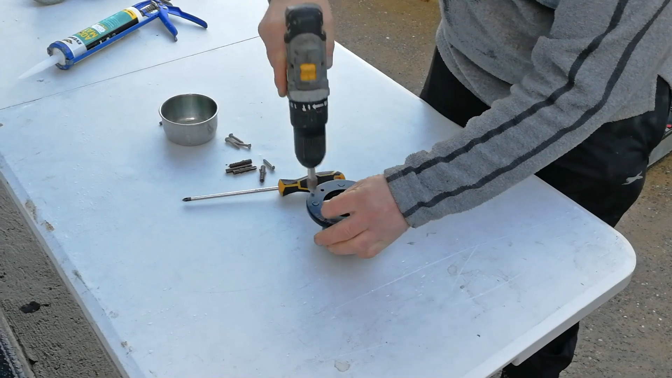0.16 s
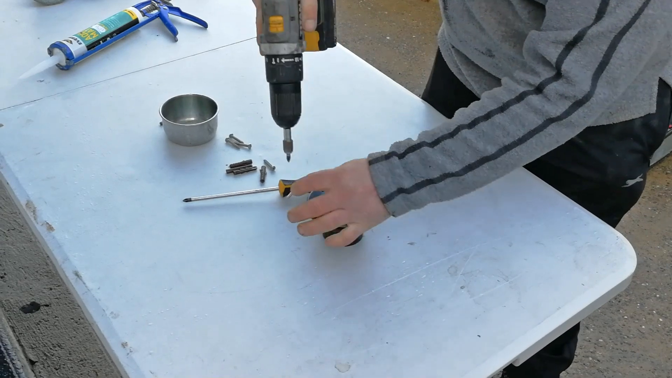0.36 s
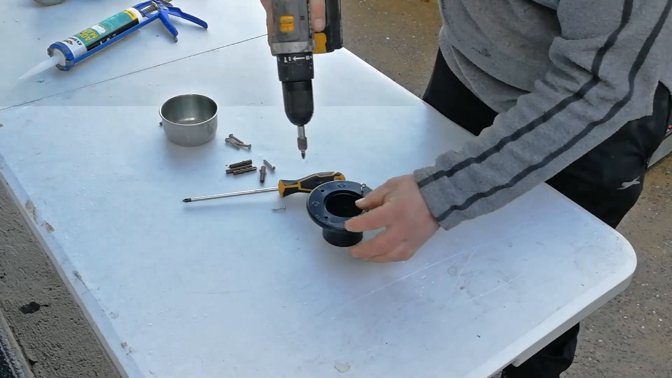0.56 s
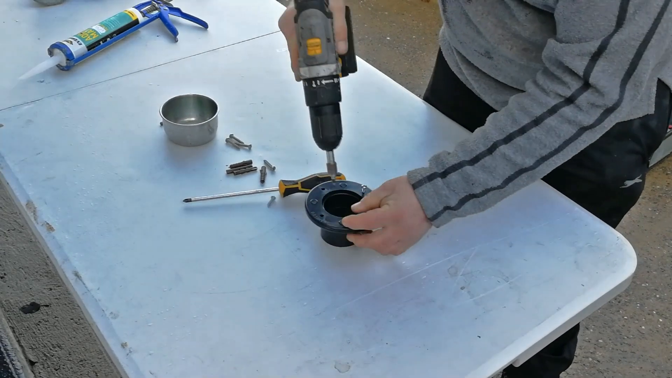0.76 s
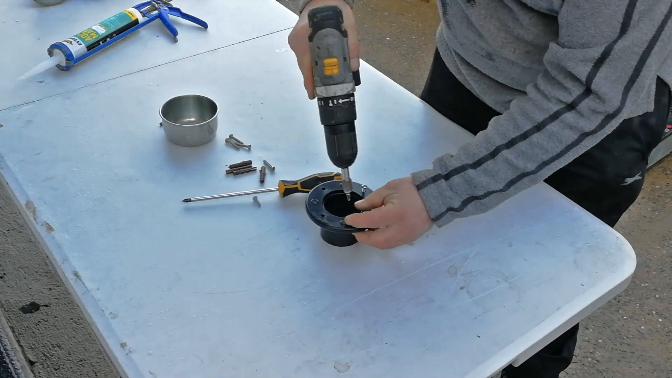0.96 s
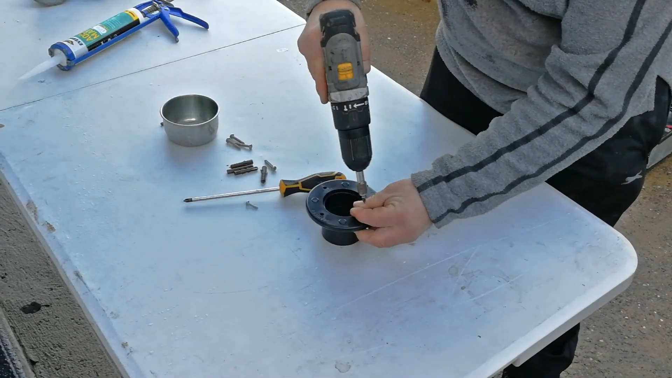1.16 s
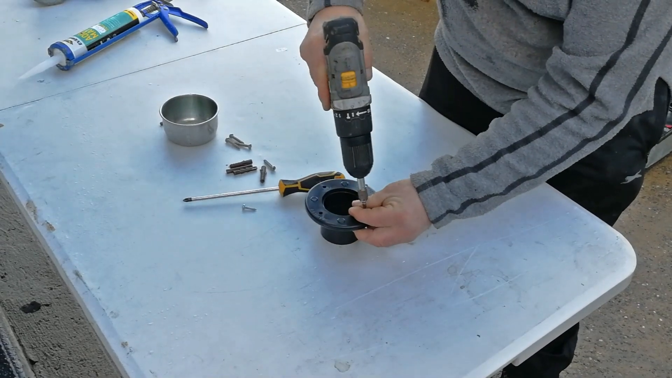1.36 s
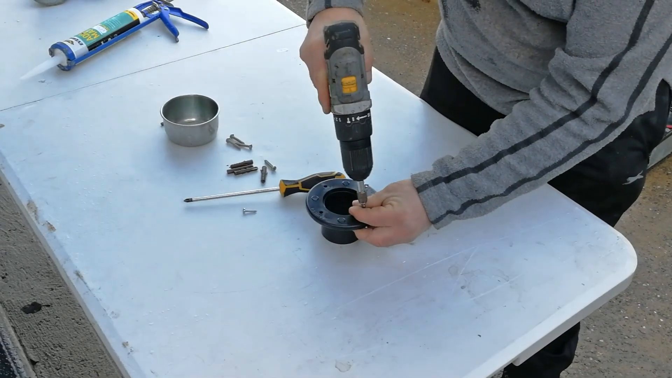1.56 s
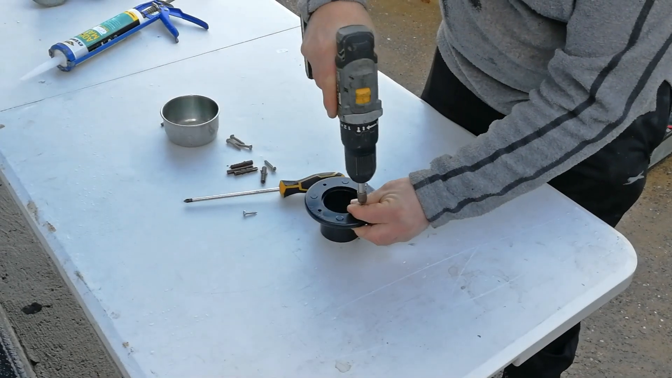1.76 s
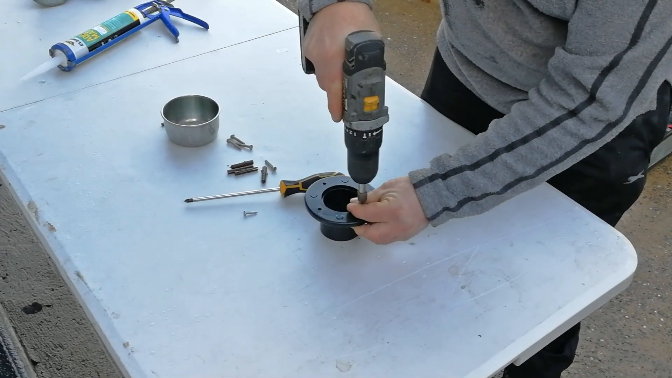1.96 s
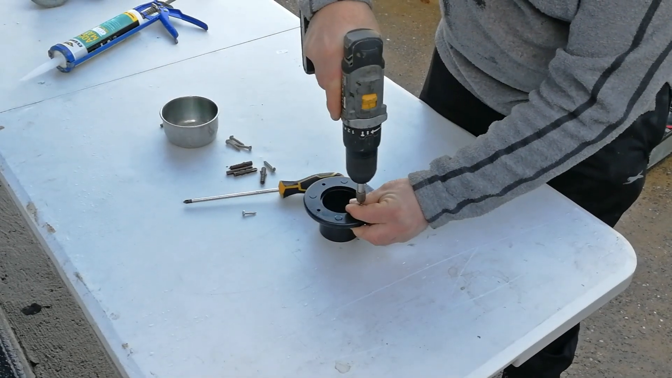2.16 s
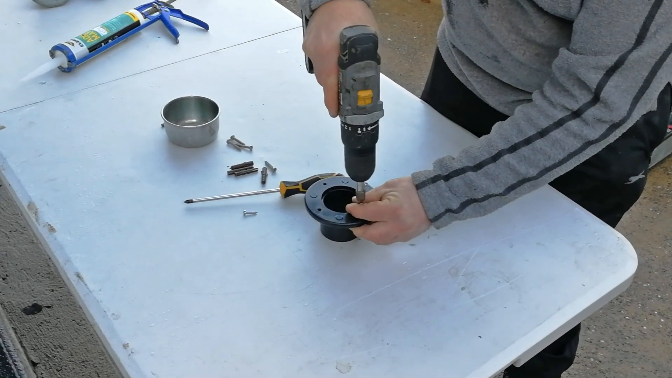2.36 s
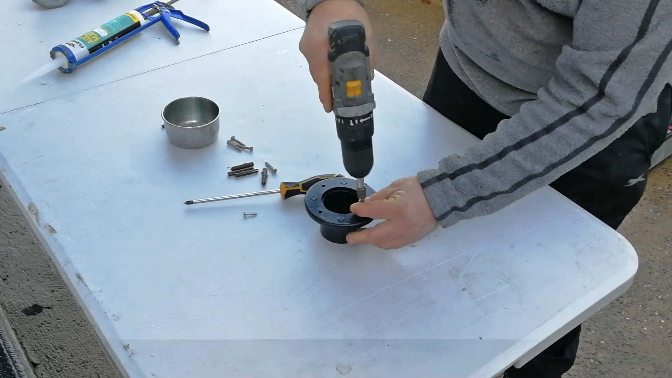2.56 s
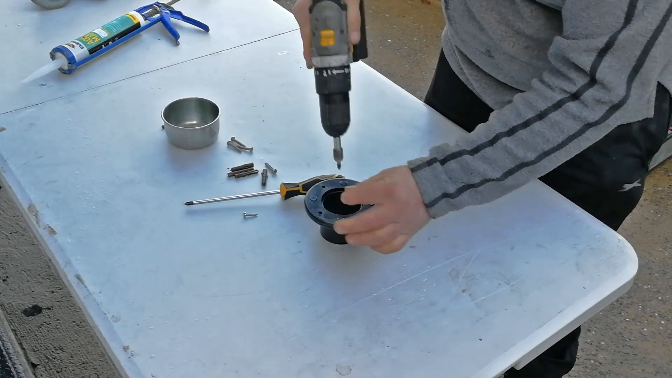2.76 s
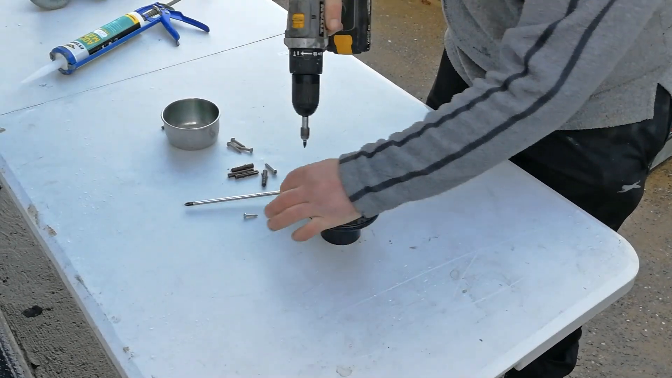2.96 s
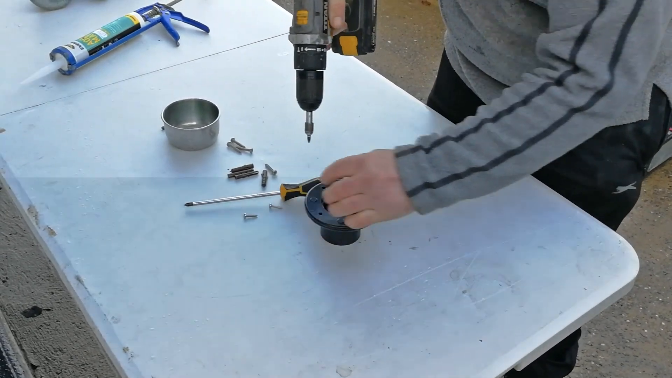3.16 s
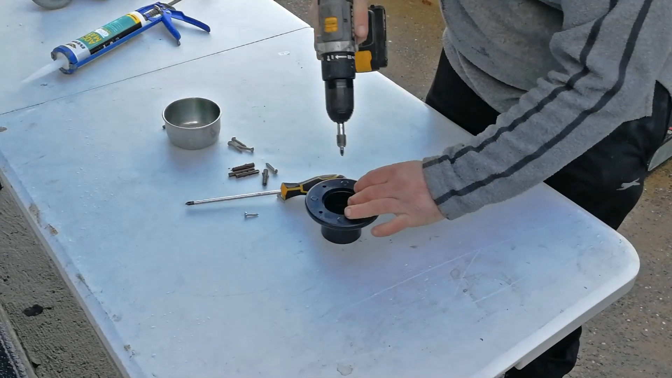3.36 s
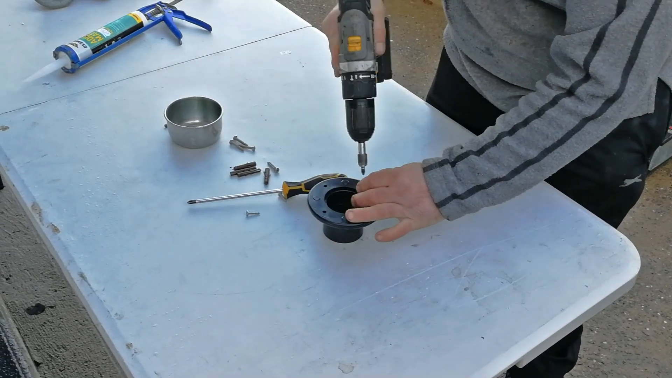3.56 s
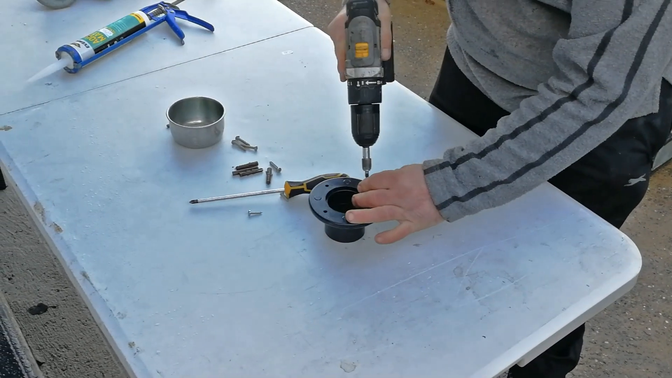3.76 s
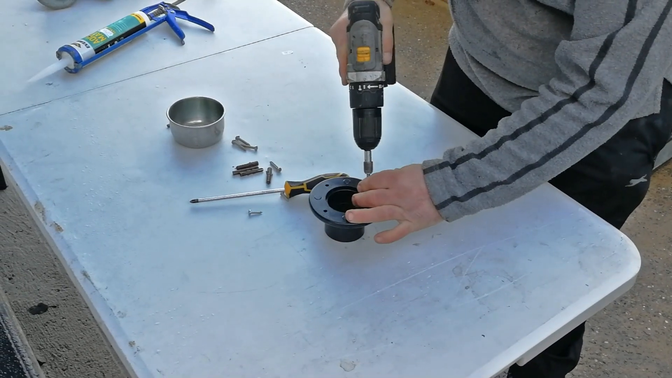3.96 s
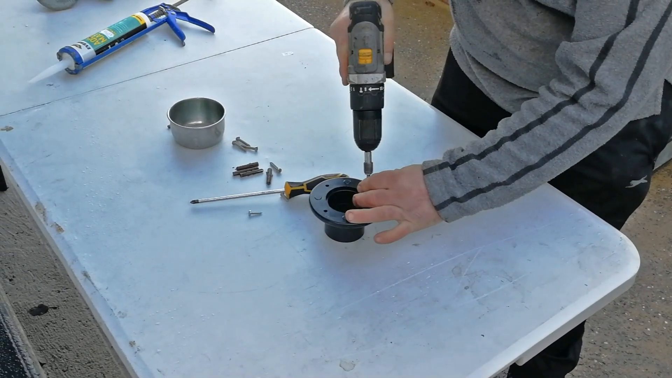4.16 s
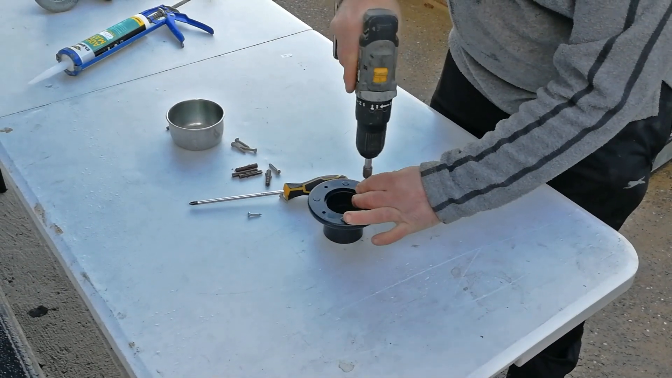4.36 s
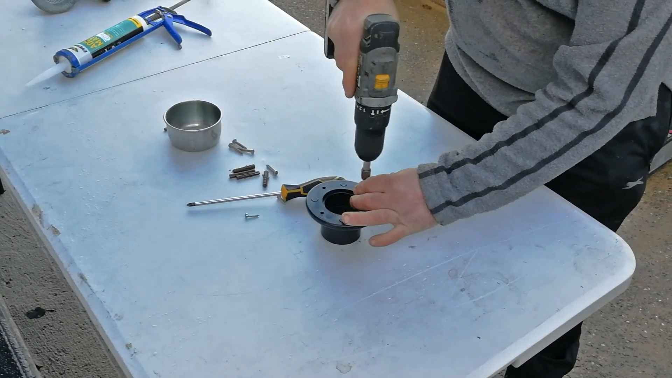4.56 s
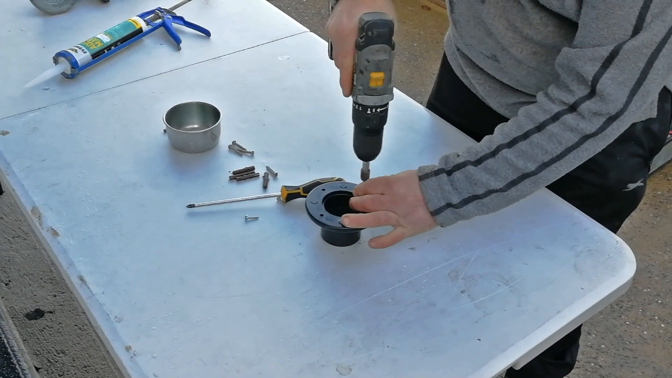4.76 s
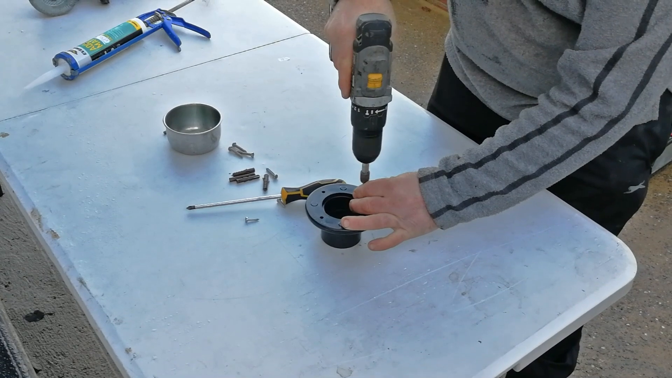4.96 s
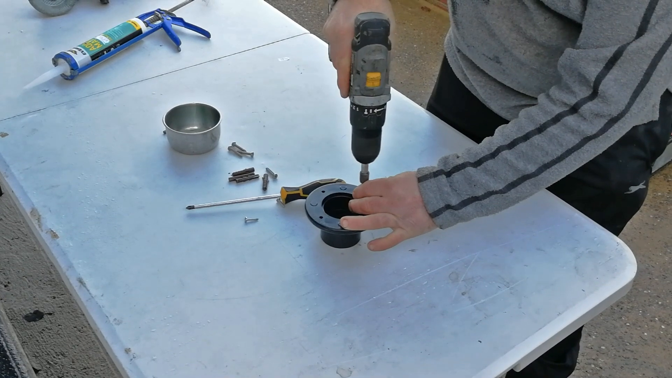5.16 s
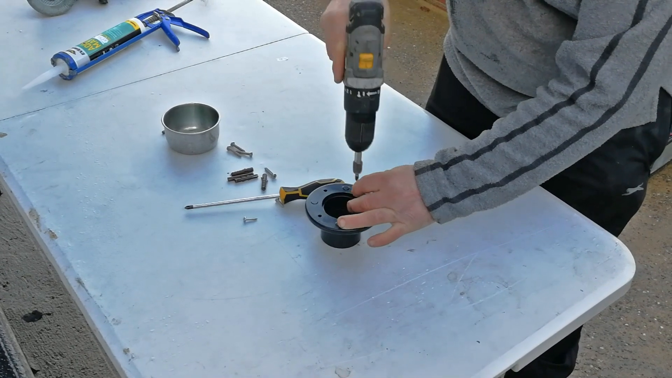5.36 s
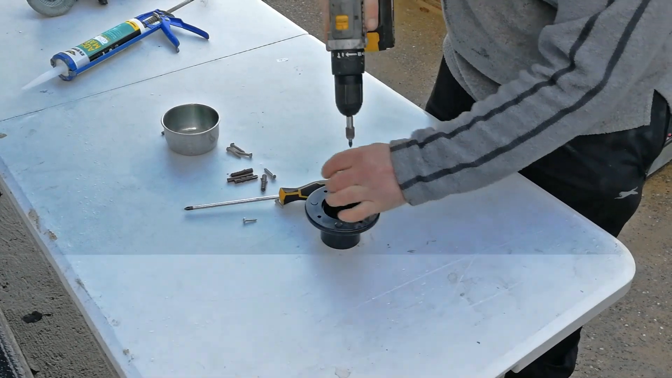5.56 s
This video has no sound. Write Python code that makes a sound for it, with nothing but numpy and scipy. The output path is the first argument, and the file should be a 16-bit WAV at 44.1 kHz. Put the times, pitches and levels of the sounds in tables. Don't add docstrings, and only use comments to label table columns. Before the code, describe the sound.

A close stereo pickup hears the tail of a drill run, a click, then a small metal screw skittering on hollow plastic. Bit ticks and faint rubbing lead into a gritty, whining drill burst that stops sharply. More screw bounces, a firm scrape and low tabletop knocks come before the final burst, with uneven jolts under it. Soft traffic rumble and slight hiss fill the open yard.

```python
import sys
import numpy as np
from scipy import signal
from scipy.fft import rfft, irfft, next_fast_len
from scipy.io import wavfile
from scipy.ndimage import uniform_filter1d

SR = 44100
rng = np.random.default_rng(int(sys.argv[2]) if len(sys.argv) > 2 else 0)


def level_to_linear(level):
    exponent = np.asarray(level, float) / 20
    return 10 ** exponent


def generate_wav(signal):
    frames = np.transpose(np.atleast_2d(signal))
    scaled = np.clip(frames, -1, 1) * 32767
    pcm = np.round(scaled).astype(np.int16)
    wavfile.write(sys.argv[1], SR, pcm)


N = 246959
SIZE = next_fast_len(N + 8192)
HZ = np.maximum(np.arange(SIZE // 2 + 1) * SR / SIZE, 1.)
TIME = np.arange(N) / SR
TOP_HZ = 15750
RIGHT_LAG_S = 0.00012

# (time [s], one per run)
PULL_TIMES = (-1, 1.7642, 4.4328)
LATCH_TIMES = (.1039, 2.5925, 5.3064)
# (commutator whine over rattle [dB], latch click over its usual [dB])
RUNS = [
    (-21, 0.0),
    (-7, 1),
    (-12.5, -6),
]
# (time [s], rattle level [dB], mesh whine over rattle [dB])
GEAR_LOAD = [
    [(0.0, -38.5, -2), (.11, -40.5, -1.5)],
    [(1.76, -39, -7), (1.89, -37.5, -3), (2.0, -36.5, -3.5), (2.18, -35.5, 1), (2.35, -38, -2.5),
     (2.6, -41, -9.5)],
    [(4.43, -39, -9), (4.55, -37.5, -7), (4.62, -36, -3), (4.8, -35.5, -13), (4.9, -35.5, -6),
     (5.1, -38.5, -10), (5.32, -39.5, -11)],
]
WHINE_MULTIPLES = (1, 2, 10, 20, 21, 25, 28, 31, 32, 34, 35, 36, 37, 41)
# (left level [dB], right level [dB], change after the regrip [dB])
UPPER_WHINE = [(-24.5, -28, 1.5), (-25.5, -41, 4), (-14.5, -30, -3), (-24, -27, 3), (-13, -17, -8),
               (-14.5, -35, 5), (-21, -32, -10), (-24, -32, -3), (-26, -37, 4), (-27, -40, -3.5),
               (-8, -40, -3), (-11, -41, -5), (-30, -38.5, -4), (-17, -30, -5)]
WHINE_PAN_DB = {5: -24, 15: 12.5}
# (frequency [Hz], left level [dB], right level [dB])
HOUSING = [(320, -19.5, -17), (509.26, -23.5, -36), (794, -20, -37), (972, -5.5, -9.5), (1363, 2, 2.5),
           (1570, -4.5, -1), (1847, 0, 4.5), (2213, -18, 0), (2470, 0, -38), (3440, -25.5, -38)]
# (frequency [Hz], left level [dB], right level [dB])
VENTS = [(1765.7, -24, -20), (2620, -3.5, -4.5), (3100, -3, -7.5), (3440, 2, -0.5), (3793.7, -7.5, -23.5),
         (4368.7, -3.5, -6), (4376, -7.5, -11.5), (5780, -1.5, -15.5), (7058, -7, -13.5),
         (7897, -16, -10.5), (8888, -9, -21), (10700, -13, -31), (14950, -16, -52), (15953, -26, -25)]
# (time after pull or latch [s], ring level [dB], skin over ring [dB], steel over ring [dB], mode [Hz])
TRIGGER_CLICKS = [
    (-.04, -51.5, 7, -1, 6500),
    (0.0, -43, 6.5, -16, 3500),
]
BRAKE_CLICKS = [
    (-.0257, -36.5, -4, -16, 1800),
    (0.0169, -41.5, 0.5, 1.5, 5000),
]
LATCH_CLICK = (0.0, -39, 11, -18, 1680)
# (time [s], ring level [dB], skin over ring [dB], loudest mode [Hz])
SCREW_BOUNCES = [(0.4, -22.5, -6, 3120), (0.4093, -18, -8, 3260), (0.4146, -22.5, -12, 3680),
                 (0.4861, -27, -4, 4420), (0.495, -24, -16, 3110), (0.5073, -34, -11.5, 2930),
                 (0.5292, -32.5, -20, 4800), (3.0109, -19.5, -4.5, 4720), (3.018, -17, -3, 3300),
                 (3.0415, -33, -2, 2682), (3.0746, -47, 6, 2000), (3.0983, -25, 2.5, 2720),
                 (3.1241, -39, 4, 2820), (3.1287, -35.5, -9, 2700), (3.1386, -45, -3, 1215)]
# (time [s], ring
# level [dB], skin over ring [dB], loudest mode [Hz])
FITTING_KNOCKS = [(0.3715, -66, 14, 3080), (0.6666, -42, -14, 4860), (0.674, -48, -10, 4900),
                  (0.8263, -46, -2, 4550), (1.8273, -41.5, 16, 1070), (2.0995, -29.5, -3, 1753),
                  (3.3067, -48, -24.5, 2562), (3.3309, -44.5, -19, 2636), (3.4191, -60, 0, 3022),
                  (3.903, -38.5, -1, 3250), (4.4465, -42, 3, 1280), (4.468, -43, 13, 680),
                  (5.3217, -52, 19, 1760)]
# (time [s], ring level [dB], skin over ring [dB], loudest mode [Hz])
BIT_TICKS = [
    (1.3586, -41.5, 2.5, 7037),
    (1.393, -54.5, -5.5, 6626),
    (1.4029, -56, -0.5, 7671),
    (1.4165, -59, 1.5, 7497),
    (3.8929, -46.5, 6.5, 7500),
    (3.9594, -46.5, 1, 8090),
    (4.2864, -40, 1, 7800),
]
# (start [s], hardest [s], end [s], level [dB], brighter by [dB])
SCRAPES = [
    (.415, .425, .484, -43, -1),
    (3.02, 3.035, 3.097, -42, -3),
    (0.495, 0.498, 0.6, -41, -6.5),
    (0.595, 0.653, 0.78, -54, -1),
    (.93, .99, 1.2, -62.5, -2),
    (1.63, 1.71, 1.8, -58.5, 8.5),
    (3.125, 3.127, 3.23, -48, -11),
    (3.29, 3.33, 3.38, -49, -7),
    (3.96, 3.975, 4.6, -70, -7),
    (4.286, 4.31, 4.36, -34.5, -8.5),
]
# (frequency [Hz], width [Hz], left level [dB], right level [dB])
SKIN_MODES = [(702, 125, -10.5, -21), (1096, 130, 3.5, -4), (1497, 990, 1, -14), (1716, 526.5, 2, 4.5)]
SCREW_MODES = [(2770, 150, -2, -15), (3110, 610, 2, -7.5), (3710, 610, 1, -1), (4239.6, 385.1, 0, -11),
               (5156.2, 510, -2, -11.5)]
TICK_MODES = [(6300, 890, 8, -2), (7720, 710, 7, -2), (8930, 590, 8, -2.5), (10879, 960, -6.5, -22.5),
              (13212, 1900, -3.5, -15.5), (14401, 400, -23, -38.5)]
STEEL_MODES = [(7588, 1101, -5.5, -5), (9751, 1695, 2, -7.5), (12700, 1632, 3.5, -9),
               (14735, 1500, -3, -10)]
# (time [s], level [dB])
PUSHES = [(0.022, -29.5), (1.368, -33.5), (1.381, -43), (1.828, -26.5), (1.869, -30.5), (1.899, -49),
          (3.89, -29), (4.254, -38.5), (4.287, -27), (4.469, -21), (4.499, -32.5)]
# (time [s], level [dB])
JOLTS = [(1.985, -30.5), (2.254, -38), (2.334, -37.5), (2.391, -36.5), (2.449, -42), (4.2931, -22),
         (4.3073, -27.5), (4.329, -33), (4.767, -28.5), (4.802, -28), (4.819, -30.5), (4.839, -34),
         (4.864, -30), (4.925, -26.5), (4.959, -30), (5.054, -31.5), (5.079, -26.5), (5.103, -33),
         (5.124, -39.5)]
# (frequency [Hz], level [dB], t60 [s])
TOP_MODES = [(109.7, -17.5, 0.68), (138.5, 0, 0.24672), (155.2, -1, 0.19), (188.4, -8, 0.2),
             (260.82, -12, 0.13), (339, -13.5, 0.15), (423, -10, 0.13), (560, -23, 0.093), (650, 1, 0.086)]
# (frequency [Hz], level [dB per Hz])
TRAFFIC_SPECTRUM = [(12, -33), (20, -2.5), (60, 0.5), (101, -2.5), (127, -7), (222, -5), (270, -8),
                    (377, -16), (422, -11.5), (499, -19), (1090, -7), (1710, -16), (2020, -15.5),
                    (2390, -24), (16000, -53.5)]
# (frequency [Hz], left minus right [dB])
TRAFFIC_PAN = [(60, 0), (350, -1.5), (700, 1.5), (1500, -.5), (2200, -1.5), (3500, 5.5), (5500, 3),
               (8000, .5)]
# (time [s], swell [dB])
TRAFFIC_SWELL = [
    (0, 2),
    (.7, 3),
    (1.2, 1.5),
    (1.7, 1.5),
    (2.8, -1.5),
    (3.6, -1),
    (4.2, 0),
    (5.6, 0.5),
]
# (frequency [Hz], near sources [-1 to 1], far sources [-1 to 1])
ALIKE = [(150, 0.94, 1), (294, 0.63, 0.73), (616, -.2, -.4), (1095, 1, 0), (1620, 0.66, 0.1),
         (2834.4, 0.59, 0), (4140.5, 0.63, 0), (5937, 0.51, 0.1), (9116, 0.2, 0), (15000, 0.7, 0)]

FREE_HZ, FULL_HZ, START_SHARE, SPIN_UP_S = 352, 347.4, .505, .074
SOFT_START_S, SOFT_START_DB = .075, -20.5
BRAKE_S, BRAKE_DROP_HZ, BRAKE_SURGE_DB, CUT_S, CUT_DB = .066, 40, 5.5, 0.023, -25
LOADED_DB, WHINE_PER_LOAD, HISS_PER_LOAD = -36, 1.5, 0.35
HISS_FULL_DB, HISS_SLOW_DB, HISS_BRAKED_DB = -1, 22.5, -3.5
HISS_WAKE_DB, HISS_WAKE_S, MESH_BRAKED_DB = -16, .016, 7
REGRIP_S = 3.5
# (steel tick over ring [dB], t60 [s], more t60 per dB of skin [s]); flat landings ring longer
SCREW_HIT, FITTING_HIT, BIT_HIT = (-7.5, .038, .0012), (-15, 0.028, 0), (9, .0155, 0)
SWITCH_T60_S, BRAKE_T60_S = 0.019, 0.023
SCRAPE_FADE_DB, SCRAPE_EDGE_DB = -21, -5.5
# (length [s], rattle over push [dB])
PUSH, JOLT = (.0018, -3.2), (0.0034, -6.5)


def drill():
    shaft_hz, rattle_db, hiss_db, commutator_db, mesh_db = motor()
    shaft_hz = np.maximum(shaft_hz, 100)
    angle = 2 * np.pi * np.cumsum(shaft_hz * (1 + 0.0008 * walk(40))) / SR
    angle = np.array([angle, angle - 2 * np.pi * shaft_hz * RIGHT_LAG_S])
    rattle = uniform_filter1d(level_to_linear(rattle_db), 90)
    hiss = uniform_filter1d(level_to_linear(rattle_db + hiss_db) * (hiss_db > -100), 90)
    alike = across(ALIKE)[0]
    teeth = rng.standard_normal((2, N)) * level_to_linear(2 * walk(400) + .5 * walk(33)) * rattle
    pulsing = 1 + 0.21 * np.cos(angle[0])
    brushes = rng.standard_normal((2, N)) * pulsing * level_to_linear(1.0028 * walk(300) + .5 * walk(18)) * hiss
    housing = ports(teeth, alike, level_to_linear(2.5) * unit(level_to_linear(across(HOUSING))))
    vents = ports(brushes, alike, level_to_linear(1.5) * unit(level_to_linear(across(VENTS))))
    out = sound((housing + vents) * (HZ < TOP_HZ))
    speed = np.minimum(shaft_hz / FULL_HZ, 1)
    for k, db in ((5, commutator_db), (15, mesh_db)):
        side = level_to_linear(np.array([[.5], [-.5]]) * WHINE_PAN_DB[k])
        flutter = level_to_linear(db + 2.067 * walk(70) + 1.2 * walk(9))
        out += rattle * speed ** 6 * side * flutter * np.sin(k * angle + 0.28 * walk(150))
    for k, (left_db, right_db, regrip_db) in zip(WHINE_MULTIPLES, UPPER_WHINE):
        side = level_to_linear(np.array([[left_db + 2.0], [right_db + 7]]))
        flutter = level_to_linear(regrip_db * (TIME > REGRIP_S) + 5.0 * walk(5.91) + 1.612 * walk(90))
        phase = k * angle + rng.uniform(0, 2 * np.pi) + 0.039 * k * walk(120)
        out += side * flutter * hiss * speed ** min(2 * k, 30) * np.sin(phase)
    return out


def motor():
    out = np.full((5, N), -120.)
    for pull, latch, (commutator_db, _), load in zip(PULL_TIMES, LATCH_TIMES, RUNS, GEAR_LOAD):
        on = (TIME >= pull) & (TIME <= latch)
        since, left = TIME[on] - pull, latch - TIME[on]
        braked = np.clip(1 - left / BRAKE_S, 0, 1)
        lag = START_SHARE * np.exp(-since / SPIN_UP_S)
        load_s, *levels = np.transpose(load)
        load_db, mesh_db = (np.interp(TIME[on], load_s, c) for c in levels)
        extra_db = load_db - LOADED_DB
        start_db = SOFT_START_DB * np.clip(1 - since / SOFT_START_S, 0, 1) ** 1.5
        cut_db = CUT_DB * np.clip(1 - left / CUT_S, 0, 1)
        hiss_db = HISS_FULL_DB + HISS_SLOW_DB * lag + HISS_WAKE_DB * np.exp(-since / HISS_WAKE_S)
        out[:, on] = [FREE_HZ * (1 - lag) - BRAKE_DROP_HZ * braked ** 3,
                      load_db + start_db + cut_db + BRAKE_SURGE_DB * braked,
                      hiss_db + HISS_BRAKED_DB * braked + HISS_PER_LOAD * extra_db,
                      commutator_db + WHINE_PER_LOAD * extra_db,
                      mesh_db + MESH_BRAKED_DB * braked]
    return out


def contacts():
    buzz = uniform_filter1d(level_to_linear(rubbing() + 2.7 * walk(270) - 5.0), 300)
    blow, mode, bare = np.zeros((3, N)), np.zeros(N), np.zeros(N)
    age = TIME[:6000]
    taps, ticks = hits()
    for s, db, skin_db, tick_db, t60, hz in taps + ticks:
        i = int(s * SR)
        size = level_to_linear(np.array([db + skin_db, db, db + tick_db]))
        rate = np.log(1000) / max(t60, .004) * np.array([[.9], [1.05], [1.4]])
        buzz[:, i:i + 6000] += level_to_linear(-2.5) * size[:, None] * np.exp(-rate * age)
        blow[:, i] += level_to_linear(13) * size
        strength = level_to_linear(-2.0) * np.interp(hz, [2000, 2500, 5400, 6000], size[[0, 1, 1, 2]])
        mode[i:i + 6000] += strength * np.exp(-1.35 * rate[1] * age) * np.sin(2 * np.pi * hz * age)
    for s, db, skin_db, tick_db, t60, hz in ticks:
        i = int(s * SR)
        bare[i:i + 6000] += level_to_linear(db + tick_db - 6.5) * 1000. ** (-age / (0.83 * t60))
    alike = across(ALIKE)[0]
    sides = [(hz, l_db, r_db) for hz, _, l_db, r_db in SKIN_MODES + SCREW_MODES + TICK_MODES]
    left_db, right_db = across(sides)
    out = ports([mode, mode], alike, level_to_linear(np.array([left_db - right_db, right_db - left_db]) / 2))
    bodies = (SKIN_MODES, SCREW_MODES, TICK_MODES, STEEL_MODES)
    for body, grains, hit in zip(bodies, [*buzz, bare], [*blow, 0]):
        response = 0
        for k, (hz, width, l_db, r_db) in enumerate(body):
            side = level_to_linear(np.array([[l_db], [r_db]]))
            response = response + (-1) ** k * side * resonance(hz, 2.23 * width) ** 2
        out = out + ports(hit + grains * rng.standard_normal((2, N)), alike, unit(response))
    return sound(out * (HZ < TOP_HZ + 700))


def hits():
    def struck(rows, kind):
        tick_db, t60, longer = kind
        return [(s, db, skin_db, tick_db, t60 + longer * skin_db, hz) for s, db, skin_db, hz in rows]

    def after(start, rows, t60, more_db=0):
        return [(start + s, more_db + db, skin_db, tick_db, t60, hz) for s, db, skin_db, tick_db, hz in rows]

    taps = struck(SCREW_BOUNCES, SCREW_HIT) + struck(FITTING_KNOCKS, FITTING_HIT)
    ticks = struck(BIT_TICKS, BIT_HIT)
    for pull, latch, (_, latch_db) in zip(PULL_TIMES, LATCH_TIMES, RUNS):
        taps += after(latch, BRAKE_CLICKS, BRAKE_T60_S)
        taps += after(latch, [LATCH_CLICK], BRAKE_T60_S, latch_db)
        if pull > 0:
            ticks += after(pull, TRIGGER_CLICKS, SWITCH_T60_S)
    return taps, ticks


def rubbing():
    lean = np.array([-1, 0, 1])
    spans = []
    for start, hardest, end, db, tilt_db in SCRAPES:
        body_db = db + tilt_db * lean + SCRAPE_EDGE_DB * lean ** 2
        faint_db = body_db + SCRAPE_FADE_DB
        spans.append([(start, *faint_db), (hardest, *body_db), (end, *faint_db)])
    return along(spans, -120)


def table_top():
    force, loose = np.zeros((2, N))
    for s, db, length, rattle_db in [(*p, *PUSH) for p in PUSHES] + [(*j, *JOLT) for j in JOLTS]:
        i, n = int(s * SR), max(int(length * SR), 20)
        force[i:i + n] += level_to_linear(db) * np.sin(np.pi * np.arange(n) / n) / n
        loose[i] += level_to_linear(db + rattle_db - 2.5)
    decay = 1000. ** (-TIME[:SR // 4] / .2)
    rocking = through(loose, rfft(decay, SIZE)) * rng.standard_normal((2, N)) * level_to_linear(3 * walk(120))
    upper = resonance(283.0, 136.0) + 0.65 * resonance(380.0, 134) + 0.3 * resonance(570.0, 120.0)
    rattle = sound(ports(rocking, across(ALIKE)[0], level_to_linear(-9.5) * unit(upper)))
    age = TIME[:SR // 2]
    ring = sum(level_to_linear(db) * np.sin(2 * np.pi * hz * age) * 1000. ** (-age / t60) for hz, db, t60 in TOP_MODES)
    radiation = resonance(311.0, 374.0) * level_to_linear(np.array([[2.7], [3.3]]))
    return rattle + through(force, rfft(ring, SIZE) * radiation)


def yard(x, t60=0.27, wet_db=-13):
    age = TIME[:SR // 3]
    tail = rng.standard_normal((2, len(age))) * 1000. ** (-age / t60) * (age > .004)
    wash = rfft(tail / np.linalg.norm(tail[0]), SIZE) * resonance(1670.0, 10200)
    return x + level_to_linear(wet_db) * through(x, wash)


def traffic():
    pan_db = np.array([[.5], [-.5]]) * across(TRAFFIC_PAN)
    colour = unit(level_to_linear(across(TRAFFIC_SPECTRUM) + pan_db))
    pair = ports(rng.standard_normal((2, N)), across(ALIKE)[1], colour * (HZ < TOP_HZ))
    swell_db = along([TRAFFIC_SWELL], 0)[0] + 0.78 * walk(2.1)
    octaves = np.log2(np.clip(HZ, 16, 16384))
    out = 0
    for octave in range(4, 15, 2):
        band = np.sqrt(np.clip(1 - np.abs(octaves - octave) / 2, 0, 1))
        level_db = swell_db * min(1, 10 / octave) ** 4 + 1.5 * walk(5.03)
        out = out + level_to_linear(level_db) * sound(pair * band)
    return level_to_linear(-50.33) * out


def capsules():
    return level_to_linear(-75) * through(rng.standard_normal((2, N)), 1. * (HZ < TOP_HZ))


def across(table):
    hz, *columns = np.transpose(table)
    return np.array([np.interp(np.log(HZ), np.log(hz), c) for c in columns])


def along(spans, off):
    out = np.full((len(spans[0][0]) - 1, N), 1. * off)
    for rows in spans:
        s, *columns = np.transpose(rows)
        on = (TIME >= s[0]) & (TIME <= s[-1])
        out[:, on] = [np.interp(TIME[on], s, c) for c in columns]
    return out


def sound(spectrum):
    return irfft(spectrum, SIZE)[..., :N]


def through(x, response):
    return sound(rfft(x, SIZE) * response)


def unit(response):
    return response / np.sqrt(np.mean(np.abs(response) ** 2))


def resonance(hz, width):
    return 1 / (1 + 1j * (HZ / hz - hz / HZ) * hz / width)


def walk(rate):
    k = int(SR / rate)
    held = np.repeat(rng.standard_normal(N // k + 1), k)
    return 1.09 * uniform_filter1d(uniform_filter1d(held, k), k)[:N]


def ports(pair, share, response):
    first, second = rfft(pair, SIZE)
    share = np.clip(share, -1, 1)
    late = np.exp(-2j * np.pi * HZ * RIGHT_LAG_S)
    return response * np.array([first, share * late * first + np.sqrt(1 - share ** 2) * second])


def scene():
    return yard(drill() + contacts()) + table_top() + traffic() + capsules()


def roll_off(x):
    return signal.sosfilt(signal.butter(12, 16580, fs=SR, output="sos"), x)


def record(dry):
    return roll_off(dry)


dry = scene()
out = record(dry)
generate_wav(out)
```